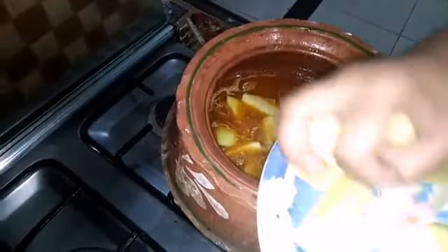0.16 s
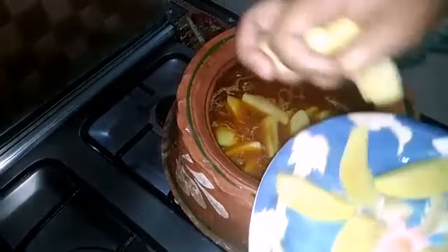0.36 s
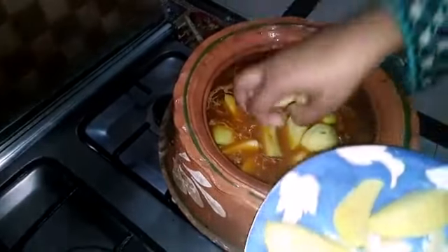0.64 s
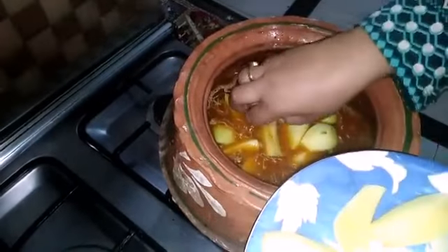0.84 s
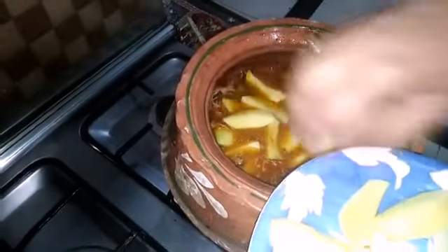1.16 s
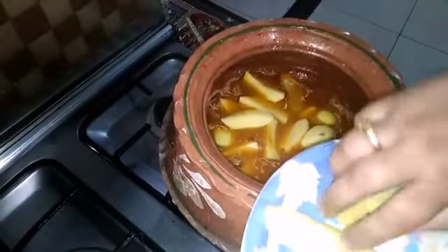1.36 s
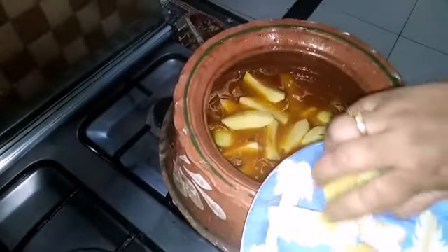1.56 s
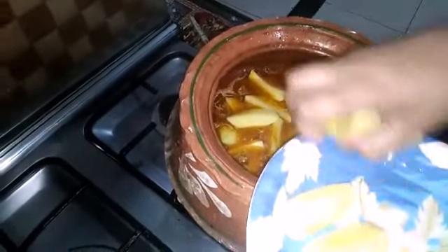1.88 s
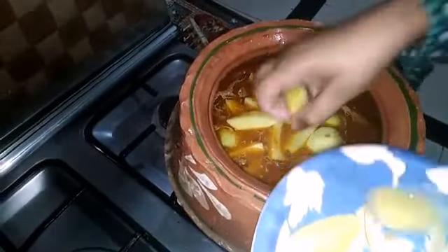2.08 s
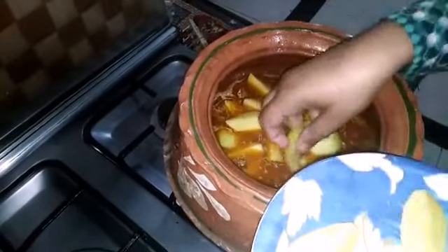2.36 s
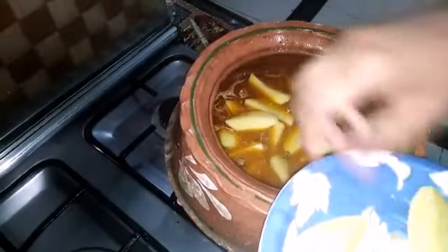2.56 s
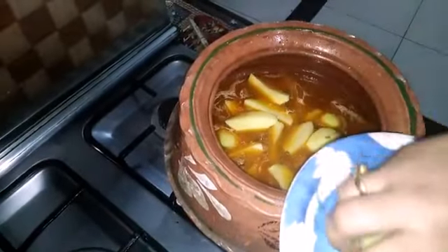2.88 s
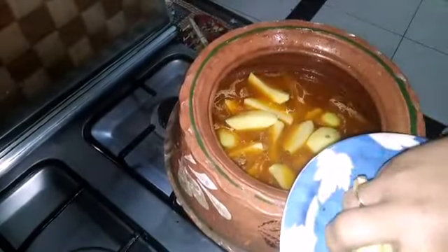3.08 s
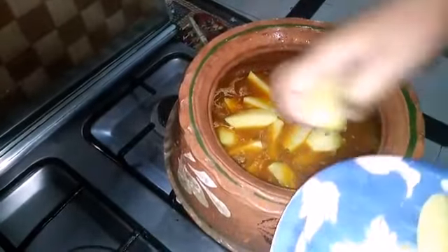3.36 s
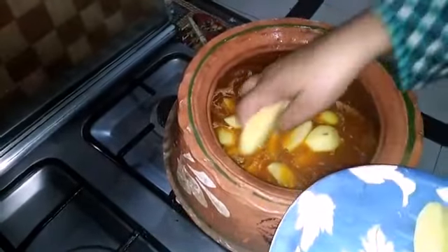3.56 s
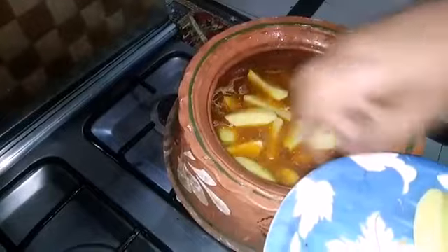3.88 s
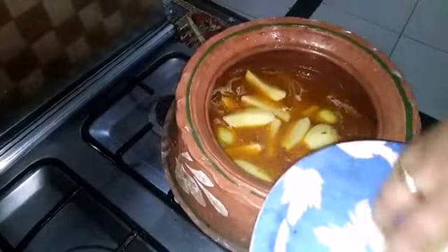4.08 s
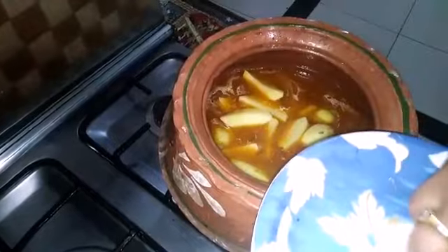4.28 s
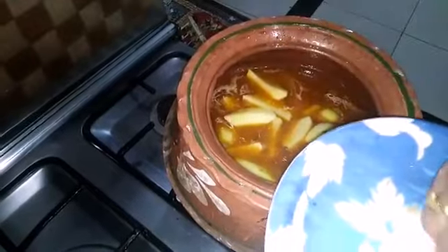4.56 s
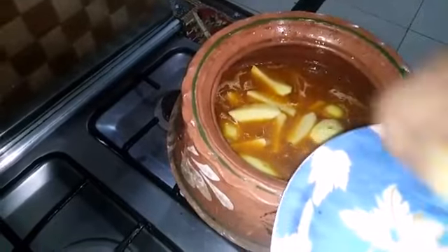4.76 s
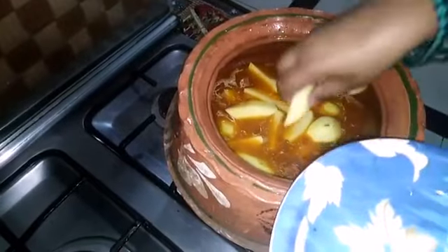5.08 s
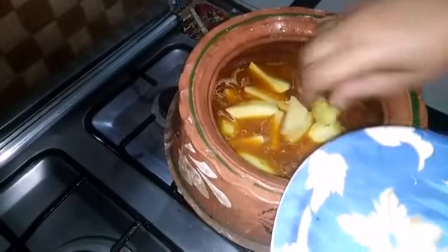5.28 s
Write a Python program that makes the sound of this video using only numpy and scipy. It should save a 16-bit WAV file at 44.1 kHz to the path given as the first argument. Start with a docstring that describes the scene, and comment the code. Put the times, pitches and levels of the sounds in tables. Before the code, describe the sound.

A near stereo microphone catches wet fingers taking potato slices from a ceramic plate and dropping them into a clay pot. Small plops and clicks lead to a swish, gritty rubbing and low bumps with short plate rings. A hard clack stands out past the middle, then quieter plops, glaze rubs, little squeaks and a scrape. The small hard room answers briefly over steady low hum.

```python
"""A hand sets raw potato pieces into the gravy of a clay pot and gathers more on a plate, close by.
Soft plops (low tones rising in pitch) and small smacks (noise bursts) come first, then a double swish of
sinking resonances. A cluster of thumps (single pressure swings) rings the plate (damped modes), two more
follow, then a hard clack of crockery modes, more plops, rising squeaks (swept sines) and a last scrape.
Rubbing noise, tiled-room reverberation, a low hum, a rumble and a soft rush lie around them."""
import sys
import numpy as np
from scipy import signal
from scipy.fft import rfft, irfft, next_fast_len
from scipy.io import wavfile
from scipy.ndimage import map_coordinates

SR = 44100
rng = np.random.default_rng(int(sys.argv[2]) if len(sys.argv) > 2 else 0)


def transcribe(signal):
    """Save signal, clipped to [-1, 1], as a 16-bit WAV file at the path in sys.argv[1]."""
    frames = np.atleast_2d(signal).T
    limited = np.clip(frames, -1, 1)
    pcm = np.round(limited * 32767).astype(np.int16)
    wavfile.write(sys.argv[1], SR, pcm)


N = 239405
T = np.arange(N) / SR
HIT_T = np.arange(SR // 6) / SR  # time axis of one hit
PORT_SIDES = np.array([[1], [-1]])  # left, right

# All dB are relative: each source adds its own trim.
# Background spectra. Each row: frequency in Hz, level in dB.
RUMBLE_TONE = [(15, -45), (30, -40.5), (43, -19.5), (62, -10), (90, -0.5), (130, -5), (165, -1.5),
               (205, -11.5), (280, -8.5), (370, -11.5), (480, -16), (550, -24), (630, -42), (1500, -92.5)]
RUSH_TONE = [(660, -40), (760, -9), (900, 3.5), (1050, 4), (1300, 3), (1430, -4.5), (1580, -22),
             (2500, -57)]
HISS_TONE = [(1000, -4.5), (1800, 1.5), (2150, -3.5), (2900, -11.5), (4100, 5.5), (5300, -13), (7100, -12),
             (9500, -20), (13000, -11.5), (15000, -34)]
# Hum partials. Each row: frequency in Hz, level in dB.
HUM_PARTIALS = [(89, -64.5), (117, -54.5), (135, -54)]
# Hum strength, which dips, then grows and stays. Each row: time in seconds, level in dB.
HUM_SWELL = [(0, 0.5), (1.5, -3.5), (2.4, 3), (5.43, 2)]

# Decay of the tiled room. Each row: frequency in Hz, t60 in seconds.
KITCHEN_T60 = [(150, 0.8), (600, 0.52), (1700, 0.44), (4000, 0.58), (7500, 0.38), (13000, 0.045)]
# Spectrum kept by the ceiling's echo. Each row: frequency in Hz, level in dB.
ECHO_TONE = [(300, -6), (1000, 2), (3500, 0), (5500, -11), (8000, -16), (15000, -4.5)]
# Left minus right at the microphone ports. Each row: frequency in Hz, difference in dB.
PORTS = [(120, -0.5), (300, 2), (1000, 4.5), (1800, 2.5), (3000, 4.5), (4800, 2.5), (6200, -3),
         (7500, -11.5), (10000, -14), (14000, -15.5)]
TOP_HZ = 15400

# Friction spectra. Each row: frequency in Hz, level in dB.
SCRAPE_TONE = [(1000, -11), (1800, -3), (2600, -1), (3700, 6), (4800, -2), (7500, -6.5), (8600, -53),
               (13500, -45), (15000, -47)]
RUB_TONE = [(1400, -23.5), (1760, 19.5), (2000, -20), (2350, -11), (3800, -7.5), (5200, 5), (6200, 2),
            (7300, 2.5), (10400, -1), (13300, -9), (15000, -43)]
SLIDE_TONE = [(1500, -17.5), (2500, -14.5), (3200, -13.5), (4300, 4), (5600, -2), (6900, 2.5), (9000, -2),
              (13500, 4), (14800, -27.5)]
SWISH_TONE = [(1200, -15.5), (2000, -1.5), (2700, 4), (3800, -3.5), (4800, -3.5), (7500, -3), (8500, -22),
              (15000, -26.5)]
# Faint hollow rubs. Each row: start in seconds, length in seconds, level in dB, mean resonance in Hz,
# width in Hz.
HOLLOWS = [(-.02, 0.1, -55.5, 2450, 398), (.11, 0.044, -58.5, 1730, 232), (0.31, 0.3, -67.5, 2150, 347),
           (2.612, 0.058, -61.5, 5380, 450), (2.885, 0.05, -69, 2570, 600), (3.608, 0.21, -68, 2756, 220.4),
           (3.771, 0.18, -56, 4250, 452.5), (3.763, 0.13, -59, 6550, 888), (3.888, 0.16, -65.5, 2130, 330),
           (4.364, 0.15, -59.5, 2330, 298), (4.37, 0.1, -59.5, 2860, 301), (4.823, 0.17, -61, 1760, 139.5),
           (4.86, 0.65, -73, 2230, 139), (4.964, 0.22, -72.5, 4260, 500)]
HOLLOW_ATTACK_S, HOLLOW_SAG_DB, HOLLOW_T60_S = 0.026, 7, 0.22
# Slosh of the gravy. Each row: start in seconds, length in seconds, level in dB, resonance in Hz.
SLOSHES = [(0.815, 0.21, -60, 690)]
# Double swish. Each row: start in seconds, length in seconds, level in dB, initial resonance in Hz.
SWISHES = [(1.156, 0.072, -55, 3060), (1.319, 0.12, -43, 4308)]
SWISH_ATTACK_S, SWISH_SAG_DB, SWISH_T60_S = 0.042, 9.5, 0.49
SWISH_SINK, SWISH_SINK_S = 0.32, 0.13  # share of pitch finally lost, time constant
SWISH_LOWER = .71  # weaker resonance / main resonance
# Short scrape. Each row: start in seconds, length in seconds, level in dB.
SCRAPES = [(5.25, 0.04, -43)]
SCRAPE_ATTACK_S, SCRAPE_SAG_DB, SCRAPE_T60_S = 0.032, -1.5, 0.47
# Finger rubs on the glaze. Each row: start in seconds, length in seconds, level in dB.
RUBS = [(4.075, 0.029, -56.5), (4.285, 0.16, -51.5)]
RUB_ATTACK_S, RUB_SAG_DB, RUB_T60_S = 0.054, -2.5, 0.37
# Wet fingers sliding over pieces. Each row: start in seconds, length in seconds, level in dB.
SLIDES = [(.02, 0.15, -55), (.29, 0.23, -61), (.995, 0.19, -56.5), (1.59, 0.23, -56), (1.96, 0.27, -50.5),
          (2.6, 0.091, -63), (2.76, 0.14, -48.5), (2.98, 0.1, -59), (3.765, 0.13, -47.5),
          (3.89, 0.17, -55.5), (5.25, 0.035, -36.5)]
SLIDE_ATTACK_S, SLIDE_SAG_DB, SLIDE_T60_S = 0.023, 1, 0.11
# Pieces dragged over the plate. Each row: start in seconds, length in seconds, level in dB,
# extra level of the lowest mode in dB.
DRAGS = [(-.02, 0.13, -53.5, 5), (.31, 0.092, -60, -6), (1.475, 0.18, -47.5, 1), (1.671, 0.19, -40.5, 2.5),
         (1.976, 0.31, -44.5, -4.5), (2.557, .06, -60.5, -13), (2.622, 0.051, -52, -19),
         (2.79, 0.18, -47.5, 0), (3.023, 0.12, -49, -4), (4.08, 0.059, -52.5, 6), (4.162, 0.15, -56.5, 2.5),
         (4.322, 0.19, -51, -1)]
DRAG_ATTACK_S, DRAG_SAG_DB, DRAG_T60_S = 0.022, 4.5, .38
DRAG_CATCH_DB, DRAG_CATCH_PER_S = 2.2, 140
DRAG_WAVER, DRAG_FLUTTER_DB = .014, 4  # wander of each mode: share of pitch, level
SWELL_DB = 30  # swell of every stroke during its attack
UNEVEN_DB, UNEVEN_PER_S = 1.8, 24  # hand pressure

# Finger squeaks on the glaze. Each row: start in seconds, length in seconds, start pitch in Hz,
# end pitch in Hz, level in dB.
SQUEAKS = [(4.292, 0.038, 4220, 4800, -62), (4.304, 0.021, 5150, 5600, -66),
           (4.323, 0.056, 5020, 5630, -53), (4.336, 0.031, 6500, 7250, -68),
           (4.376, 0.025, 5230, 5420, -51.5), (4.377, 0.039, 5600, 5720, -58),
           (4.39, .035, 4600, 4740, -65), (4.425, 0.034, 4890, 5210, -48),
           (4.433, 0.018, 5450, 6060, -61.5)]
# Hard clack, a graze and the blow. Each row: time in seconds, level in dB.
CLACKS = [(3.306, -24), (3.3082, -5.5)]
# Modes of the clacking crockery. Each row: frequency in Hz, level in dB, t60 in seconds,
# width as side minus mid in dB, left minus right in dB.
CROCKERY_MODES = [(830, -8, .03, -18, 0), (975, -11, .07, -14, 4), (1404, -7, .045, -2, -9),
                  (1615, -4, .05, -8, 1), (1690, -1, .05, -11, 9), (2075, -12, .06, 0, 5),
                  (2392, -9, .045, -5, -4), (2656, -3.5, .045, 13, -7), (2970, 4.5, .03, 18, -5),
                  (3240, 1.5, .042, 18, 2), (3480, -2, .022, -16, 0), (3852, -1.5, .033, -10, -1),
                  (4142, -6, .045, -16, -2), (4600, -8, .033, 13, -2), (4966, -1.5, .033, -16, -2),
                  (5280, -7, .026, 13, -4), (6195, -7.5, .045, -8, 0), (7130, -4, .022, 10, -6),
                  (7426, 0, .022, 0, -1), (10180, -17, .03, 0, 0)]
# Spectra of the clack's crack and of what it throws into the room. Each row: frequency in Hz, level in dB.
CRACK_TONE = [(300, -30.5), (500, -2), (1000, -5.5), (2000, -12.5), (3600, 1), (5000, -6.5), (5700, -12),
              (7500, -1.5), (8100, -15.5), (13300, -19.5), (14300, -26.5)]
WASH_TONE = [(300, -11.5), (900, -1.5), (1700, 1.5), (2300, 2.5), (3500, -0.5), (5000, -1.5), (7400, -7),
             (8200, -19.5), (13500, -20), (15000, -36)]
# Soft plops. Each row: time in seconds, level in dB, base pitch in Hz (before a factor).
PLOPS = [(0.128, -36, 223), (0.21, -36, 310), (0.281, -34, 303), (0.39, -30, 300), (0.406, -32, 255),
         (0.418, -30, 268), (0.477, -45, 286), (0.501, -35, 290), (0.983, -50, 490), (1.015, -37, 208),
         (3.542, -39.5, 316), (3.654, -39.5, 278), (4.006, -33, 205), (5.338, -31, 388)]

# Plate modes, some close together near 4 and 5.3 kHz. Each row: mean frequency in Hz, level in dB,
# typical t60 in seconds.
PLATE_MODES = [(1745, 14, 0.039), (2634, -5.5, 0.028), (3250, -7.5, 0.03), (3940, -16.5, 0.03),
               (4070, -9.5, 0.029), (4190, -10.5, .035), (5270, -10, 0.024), (5410, -9.5, 0.019),
               (6400, -15.5, 0.024), (7200, -13, 0.026), (8700, -18, .018)]
SPOT_DB, SPOT_OCTAVES = 10.5, .3  # lift and reach of the favoured plate modes
# Contact spectra. Each row: frequency in Hz, level in dB.
CLICK_TONE = [(300, 4.5), (1400, -10), (2600, -7), (4000, 1), (5500, 0.5), (7500, -0.5), (9000, -15),
              (16000, -29)]
KNOCK_TONE = [(300, -1), (850, 10), (1300, -4), (1950, -2.5), (2300, -1), (4500, -4), (7000, -25),
              (10000, -34.5)]
SPIT_TONE = [(3000, -58), (6500, -8), (8500, 5.5), (13500, 8.5), (14500, -15), (16000, -33.5)]
BOOM_TONE = [(60, -23), (130, -3), (300, 4), (600, -7.5), (900, -4), (1300, -21), (3000, -57.5)]
# Light taps of wet pieces. Each row: time in seconds, plate ring in dB, click in dB, favoured frequency in Hz.
TAPS = [(0.047, -56.5, -63, 2600), (0.062, -59, -43.5, 7200), (.3735, -63.5, -50, 2700),
        (1.2467, -58.5, -67, 2600), (1.7007, -42, -62, 5400), (1.7205, -42, -43.5, 4200),
        (1.8678, -43.5, -43, 5400), (1.9698, -46, -31.5, 5500), (2.0185, -46.5, -28.5, 4260),
        (2.717, -71, -29, 5100), (3.5469, -79, -43.5, 4200), (3.656, -80, -62, 2700),
        (4.0065, -64, -38, 5400), (4.215, -63, -63, 4300), (4.4995, -61, -60, 5370)]
TAP_SPIT_DB = -8.5  # above click
# Wet fingers peeling off a piece. Each row: time in seconds, spit in dB.
SMACKS = [(0.059, -41), (0.2957, -46.5), (0.3203, -46), (0.372, -37.5), (0.501, -61.5), (1.108, -38.5),
          (3.8813, -36), (4.893, -56.5)]
SMACK_CLICK_DB = -7  # above spit
# Dull little knocks. Each row: time in seconds, peak in dB, frequency in Hz.
KNOCKS = [(0.323, -42, 987), (1.247, -50, 1120), (4.216, -49.5, 1150), (4.499, -44.5, 1000),
          (4.832, -56, 1067)]
KNOCK_T60_S = 0.097
# Pieces bumping the plate. Each row: time in seconds, thump in dB, contact speed as Hz (before a factor),
# plate ring in dB, click in dB, frequency favoured by the struck spot in Hz.
THUMPS = [(0.324, -32, 239, -62, -55, 4000), (1.648, -25, 217, -53, -38.5, 4200),
          (1.7546, -20.5, 395, -32.5, -42, 4000), (1.8051, -22.5, 327, -38, -51.5, 5400),
          (2.052, -22, 285, -34.5, -22, 5450), (2.088, -27.5, 312, -36.5, -23, 4200),
          (2.107, -19, 372, -30, -38.5, 5300), (2.132, -26, 300, -55, -27.5, 7100),
          (2.1787, -12.5, 435, -32.5, -43.5, 2850), (2.8219, -23.5, 350, -50.5, -54.5, 4200),
          (3.1218, -18.5, 425, -41.5, -60, 3100)]
TOUCH_LEAD_S = 0.0019  # surfaces meet this long before the full shove
# Low cut of the thumps: little deep bass. Each row: frequency in Hz, gain in dB.
THUMP_LOW_CUT = [(25, -12), (50, -4.5), (110, -0.5), (300, 0)]


def amp(db):
    """dB to linear gain."""
    return 10 ** (np.asarray(db) / 20)


def unit(x):
    """x at rms 1."""
    return x / np.sqrt(np.mean(x ** 2) + 1e-20)


def burst(x):
    """x with the energy of 10 ms at rms 1."""
    return unit(x) * np.sqrt(.01 * SR / x.shape[-1])


def along(points, hz):
    """(Hz, value) points interpolated on a log frequency axis."""
    f, v = np.transpose(points)
    return np.interp(np.log(hz + 1), np.log(f + 1), v)


def level(rows):
    """Gain per sample from (s, dB) rows, silent outside them."""
    s, db = np.transpose(rows)
    return amp(np.interp(T, s, db, left=-150, right=-150))


def wobble(rate):
    """Smooth random curve, rate knots per second."""
    knots = rng.standard_normal(int(N * rate / SR) + 4)
    places = np.arange(0, len(knots) - 1, 1 / 8)
    return np.interp(T * rate, places, map_coordinates(knots, [places]))


def fade(t60_s):
    """Exponential decay over one hit."""
    return np.exp(-np.log(1000) * HIT_T / t60_s)


def colour(x, points):
    """Minimum-phase filter with the gain of (Hz, dB) points."""
    size = 2 * next_fast_len(x.shape[-1] // 2 + 4096)
    gain = amp(along(points, np.fft.rfftfreq(size, 1 / SR)))
    cepstrum = irfft(np.log(gain))
    cepstrum[1:size // 2] *= 2  # fold to causal
    cepstrum[size // 2 + 1:] = 0
    response = np.exp(rfft(cepstrum))
    return irfft(rfft(x, size) * response, size)[..., :x.shape[-1]]


def pair(size, alike):
    """White noise at two ports, sharing the power fraction alike."""
    a, b, both = rng.standard_normal((3, size))
    share = np.clip(alike, 0, 1)
    return np.sqrt(share) * both + np.sqrt(1 - share) * np.array([a, b])


def puff(tone, t60_s, alike, rise_s=0.0013):
    """Short burst of coloured noise."""
    envelope = fade(t60_s) * (1 - np.exp(-HIT_T / rise_s))
    return burst(colour(pair(len(HIT_T), alike) * envelope, tone))


def add(track, s, sound):
    """Mix a sound in at s seconds."""
    part = track[:, max(round(s * SR), 0):][:, :sound.shape[-1]]
    part += sound[..., :part.shape[-1]]


def stroke(start_s, length_s, db, attack_s, sag_db, t60_s):
    """Gain of one rubbing stroke: swell, sag over its length, exponential release."""
    age = T - start_s
    swell_db = SWELL_DB * np.minimum(age / attack_s - 1, 0)
    release = np.exp(-np.log(1000) * np.maximum(age - length_s, 0) / t60_s)
    return amp(db + swell_db - sag_db * np.clip(age / length_s, 0, 1)) * release


def strokes(rows, attack_s, sag_db, t60_s):
    """Gain of strokes of one shape, summed in power."""
    return np.sqrt(sum(stroke(*row, attack_s, sag_db, t60_s) ** 2 for row in rows))


def unevenness():
    """Gain of a hand that presses unevenly as it moves."""
    return unit(amp(UNEVEN_DB * wobble(UNEVEN_PER_S)))


def friction(tone, grain_db, alike):
    """Sliding contact: noise of rms 1, broken up by tiny slips."""
    return unit(colour(pair(N, alike) * amp(grain_db * wobble(350)), tone))


def hollow(hz, width_hz):
    """Rubbing noise of rms 1 in one resonance, steady or moving: a carrier with random quadratures."""
    phase = 2 * np.pi * np.cumsum(hz * np.ones(N)) / SR
    ports = [wobble(width_hz) * np.cos(phase) + wobble(width_hz) * np.sin(phase) for _ in range(2)]
    return unit(np.array(ports))


def background():
    """Wavering low hum in a rumble, a narrow rush that is brighter on the right, faint hiss."""
    hum = 0
    for hz, db in HUM_PARTIALS:
        hum = hum + amp(db + 2.6 * wobble(1.9)) * np.sin(2 * np.pi * hz * T + wobble(4.3))
    hum = level(HUM_SWELL) * hum
    rumble = amp(-50.5 + wobble(10)) * unit(colour(pair(N, alike=0.9), RUMBLE_TONE))
    left, right = amp(-51.5 + wobble(6.7)) * unit(colour(pair(N, alike=0.38), RUSH_TONE))
    left = colour(left, [(1000, -7), (1100, -7.0), (1250, -28.0), (1600, -10.5)])
    hiss = amp(-82.5 + 0.67 * wobble(1.5)) * unit(colour(pair(N, alike=0.033), HISS_TONE))
    return hum + rumble + np.array([left, right]) + hiss


def kitchen(x):
    """Tiled room's answer: noise tail in which each frequency dies at its own speed."""
    hz, t, z = signal.stft(rng.standard_normal((2, SR * 3 // 4)), SR, nperseg=256)
    decay = np.exp(-np.log(1000) * t / along(KITCHEN_T60, hz)[:, None])
    tail = signal.istft(z * decay, SR, nperseg=256)[1]
    tail *= 1 - np.exp(-np.arange(tail.shape[1]) / SR / 0.001)
    return signal.fftconvolve(x, tail / np.linalg.norm(tail[0]), axes=1)[:, :N]


def hollow_rubs():
    """Some strokes sound faintly hollow, each in one resonance that wavers and breaks up."""
    out = np.zeros((2, N))
    for s, length_s, db, hz, width_hz in HOLLOWS:
        gain = stroke(s, length_s, db, HOLLOW_ATTACK_S, HOLLOW_SAG_DB, HOLLOW_T60_S)
        out += gain * hollow(hz * (1 + .022 * wobble(20)), width_hz)
    return out * unevenness()


def slosh():
    """Thick gravy swirls around dipping fingers and murmurs in the mouth of the pot."""
    out = np.zeros((2, N))
    for s, length_s, db, hz in SLOSHES:
        gain = stroke(s, length_s, db, attack_s=0.032, sag_db=0.5, t60_s=0.22)
        out += gain * hollow(hz, width_hz=620)
    return out * unevenness()


def swish():
    """Something is drawn along twice, further off; two resonances sink while the room holds earlier pitch."""
    out = np.zeros((2, N))
    hiss = friction(SWISH_TONE, grain_db=3, alike=0.045)
    for s, length_s, db, hz in SWISHES:
        sunk = SWISH_SINK * (1 - np.exp(-np.maximum(T - s, 0) / SWISH_SINK_S))
        main = hollow(hz * (1 - sunk), width_hz=480)
        lower = amp(-7) * hollow(SWISH_LOWER * hz * (1 - sunk), width_hz=400)
        gain = stroke(s, length_s, db, SWISH_ATTACK_S, SWISH_SAG_DB, SWISH_T60_S)
        out += gain * (amp(-4) * (main + lower) + amp(-7.5) * hiss)
    out *= amp(1.7 * wobble(90))
    return (amp(-1.5) * out + amp(-3) * kitchen(out)) * amp(PORT_SIDES)  # 2 dB to the left


def scrapes():
    """Friction noise of a scrape, of rubs on the glaze and of fingers among the wet pieces."""
    scrape = strokes(SCRAPES, SCRAPE_ATTACK_S, SCRAPE_SAG_DB, SCRAPE_T60_S)
    scrape = scrape * friction(SCRAPE_TONE, grain_db=1.0, alike=0.092)
    rub = amp(-4.5) * strokes(RUBS, RUB_ATTACK_S, RUB_SAG_DB, RUB_T60_S)
    rub = rub * friction(RUB_TONE, grain_db=2.5, alike=0.3)
    slide = amp(-11.5) * strokes(SLIDES, SLIDE_ATTACK_S, SLIDE_SAG_DB, SLIDE_T60_S)
    slide = slide * friction(SLIDE_TONE, grain_db=3.0, alike=0.035)
    return scrape + rub + slide * amp(1.8 * wobble(45)) * unevenness()


def drags():
    """Dragged pieces catch and go; hand-damped plate modes waver and take turns as the contact travels."""
    modes = []
    for hz, db, t60_s in PLATE_MODES:
        flutter = amp(db + DRAG_FLUTTER_DB * wobble(14))
        modes.append(flutter * hollow(hz * (1 + DRAG_WAVER * wobble(12)), width_hz=7.5 / t60_s))
    slips = friction(CLICK_TONE, grain_db=2.5, alike=0.062) * amp(2.5 * wobble(65))
    shape = DRAG_ATTACK_S, DRAG_SAG_DB, DRAG_T60_S
    lowest_gain = strokes([(s, length_s, db + low_db) for s, length_s, db, low_db in DRAGS], *shape)
    upper_gain = strokes([row[:3] for row in DRAGS], *shape)
    lowest = lowest_gain * amp(-11.5) * unit(modes[0])
    upper = upper_gain * (amp(-10.5) * unit(sum(modes[1:])) + amp(-15.0) * slips)
    catching = unit(amp(DRAG_CATCH_DB * wobble(DRAG_CATCH_PER_S)))
    return (lowest + upper) * unevenness() * catching


def squeaks():
    """A wet finger sticks and slips on the glaze: thin rising chirps with a weak octave."""
    out = np.zeros((2, N))
    for s, length_s, start_hz, end_hz, db in SQUEAKS:
        u = np.clip((T - s) / length_s, 0, 1)
        hz = (start_hz + (end_hz - start_hz) * u) * (1 + 0.014 * wobble(600))
        phase = 2 * np.pi * np.cumsum(hz) / SR
        tone = np.sin(phase) + amp(-15) * np.sin(2 * phase)
        out += amp(db + 1.4 * wobble(250)) * np.sin(np.pi * u) * tone
    return out


def crockery(scatter_db):
    """Crockery's ring: each mode radiates its own way, so has its own stereo width and side."""
    out = 0
    for hz, db, t60_s, width_db, pan_db in CROCKERY_MODES:
        pan = unit(amp(PORT_SIDES * pan_db / 2))
        swing = rng.choice([-1, 1]) * amp(db + scatter_db * rng.normal()) * pan
        phase = PORT_SIDES * np.arctan(amp(width_db))
        out = out + swing * fade(t60_s) * np.sin(2 * np.pi * hz * HIT_T + phase)
    return burst(out * (1 - np.exp(-HIT_T / 0.00096)))


def clack():
    """Hard crockery is knocked: crack and short ring, near scatter, ceiling echo, room wash."""
    out, thrown = np.zeros((2, 2, N))
    for s, db in CLACKS:
        body = amp(-13.5) * crockery(scatter_db=.5)
        crack = amp(-19.5) * puff(CRACK_TONE, t60_s=.016, alike=.65, rise_s=.0004)
        scatter = amp(-31) * puff(CRACK_TONE, t60_s=0.18, alike=0.29, rise_s=0.0054)
        scatter = scatter * amp(1.6 * wobble(250)[:len(HIT_T)])
        add(out, s, amp(db) * (body + crack + scatter))
        add(thrown, s, amp(db - 28.0) * puff(WASH_TONE, t60_s=0.012, alike=0.32, rise_s=0.00058))
    add(out, .0132, amp(-6.0) * colour(out, ECHO_TONE))  # ceiling, 13.2 ms later
    return out + kitchen(thrown)


def plops():
    """Pieces settle in thick gravy: a few low cycles that rise in pitch."""
    out = np.zeros((2, N))
    for s, db, hz in PLOPS:
        turns = hz * 1.12 * (HIT_T + 6 * HIT_T ** 2)
        envelope = fade(9 / hz) * (1 - np.exp(-HIT_T / 0.00017))
        add(out, s + 0.0015, amp(db - 2) * np.sin(2 * np.pi * turns) * envelope)
    return out


def wet_click(click_db, spit_db):
    """Wet surfaces touch or part with a click and a fine spit."""
    click = amp(click_db - 12) * puff(CLICK_TONE, t60_s=0.023, alike=0.085, rise_s=0.0043)
    spit = amp(spit_db - 9) * puff(SPIT_TONE, t60_s=0.018, alike=0.14, rise_s=0.003)
    return click + spit


def ring(modes, scatter_db, spread_hz):
    """Modes struck together at new strengths; the higher ones reach the ports out of step."""
    out = 0
    for hz, db, t60_s in modes:
        phase = PORT_SIDES / 2 * rng.normal() * hz / spread_hz
        swing = rng.choice([-1, 1]) * amp(db + scatter_db * rng.normal())
        out = out + swing * fade(t60_s) * np.sin(2 * np.pi * hz * HIT_T + phase)
    return burst(out * (1 - np.exp(-HIT_T / 0.00082)))


def plate_blow(ring_db, click_db, spot_hz):
    """A push rings the whole plate, its sharp click only the upper modes; the spot favours some."""
    scatter = rng.standard_normal((len(PLATE_MODES), 3)) * [.011, 0, .18]  # log pitch, none, log t60
    held = np.array(PLATE_MODES) * np.exp(scatter)
    octaves_off = np.log2(held[:, 0] / spot_hz)
    held[:, 1] += SPOT_DB * np.exp(-(octaves_off / SPOT_OCTAVES) ** 2)
    push = amp(ring_db - 2.5) * ring(held, scatter_db=1.5, spread_hz=10000)
    knock = amp(ring_db - 8.5) * puff(KNOCK_TONE, t60_s=.025, alike=0.45)
    tink = amp(click_db - 14.5) * ring(held[1:], scatter_db=2, spread_hz=3000)
    return push + knock + tink + wet_click(click_db, click_db + TAP_SPIT_DB)


def ticks():
    """Bumps and taps click and ring the plate, damped anew by hand and load; smacks leave it still."""
    out = np.zeros((2, N))
    bumps = [(s - TOUCH_LEAD_S, *blow) for s, _, _, *blow in THUMPS]
    for s, ring_db, click_db, spot_hz in bumps + list(TAPS):
        add(out, s, plate_blow(ring_db, click_db, spot_hz))
    for s, db in SMACKS:
        add(out, s, wet_click(db + SMACK_CLICK_DB, db))
    for s, db, hz in KNOCKS:
        add(out, s, amp(db) * np.sin(2 * np.pi * hz * HIT_T) * fade(KNOCK_T60_S))
    return out


def thumps():
    """A soft piece shoves the plate once: a dip and a crest of pressure, then stove and pot boom briefly."""
    out = np.zeros((2, N))
    lead_s = .005  # room for the dip ahead of s
    for s, db, hz, *_ in THUMPS:
        u = 2 * np.pi * hz * 1.066 * (HIT_T - lead_s)
        add(out, s - lead_s, amp(db + 2.0) * u * np.exp((1 - u * u) / 2))
        add(out, s + 0.00091, amp(db - 17.0) * puff(BOOM_TONE, t60_s=0.13, alike=0.88))
    return colour(out, THUMP_LOW_CUT)


def scene():
    """Knocks, plops and squeaks with the kitchen's answer, among rubbing sounds and over the hum."""
    low, small, hard, chirps = thumps() + plops(), ticks(), clack(), squeaks()
    room = kitchen(amp(-21.5) * low + amp(-13.5) * small + amp(-20.0) * hard + amp(-12.5) * chirps)
    boom = amp(-12.0) * kitchen(low).mean(axis=0)  # long waves reach both ports alike
    rubbing = swish() + scrapes() + drags() + hollow_rubs() + slosh()
    return low + small + hard + chirps + rubbing + room + boom + background()


def record(dry):
    """Left port hears more body, right more treble; nothing is kept above the band limit."""
    size = next_fast_len(N + SR // 4)
    hz = np.fft.rfftfreq(size, 1 / SR)
    gains = amp(along(PORTS, hz) * PORT_SIDES / 2)
    band = np.clip((TOP_HZ - hz) / 700 + .5, 0, 1)  # 700 Hz slope centred on TOP_HZ
    return irfft(rfft(dry, size) * gains / gains.mean(axis=0) * band, size)[:, :N]


dry = scene()
out = record(dry)
transcribe(out)
```